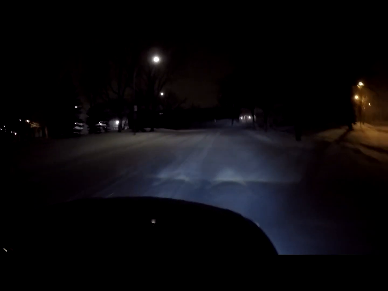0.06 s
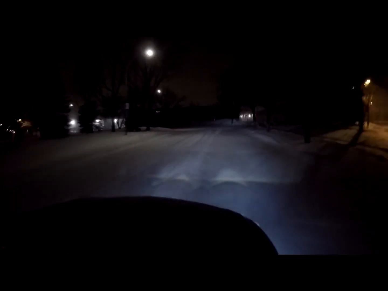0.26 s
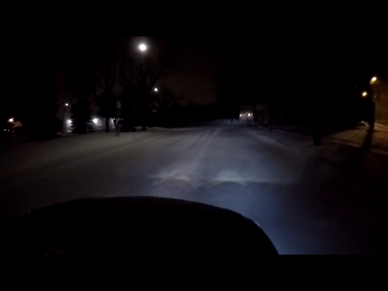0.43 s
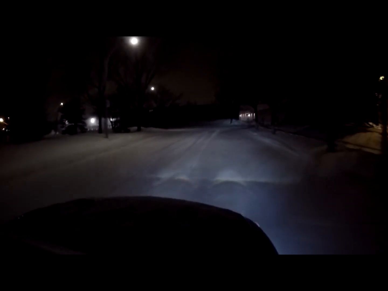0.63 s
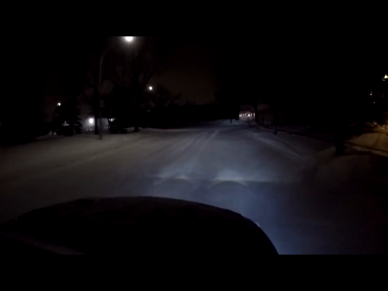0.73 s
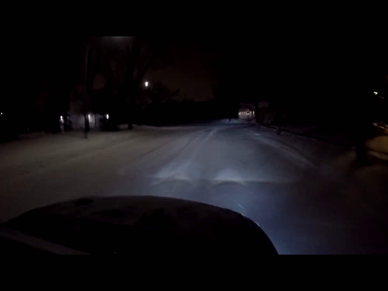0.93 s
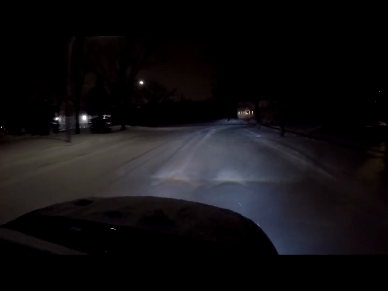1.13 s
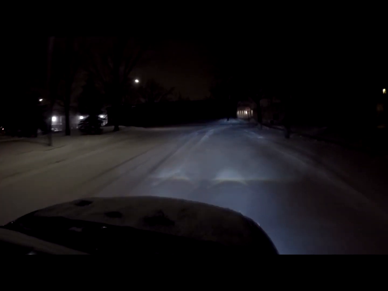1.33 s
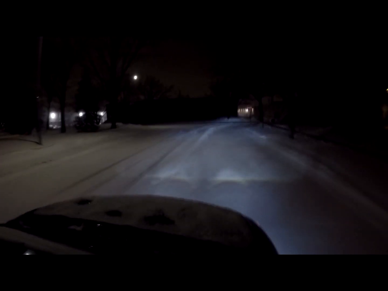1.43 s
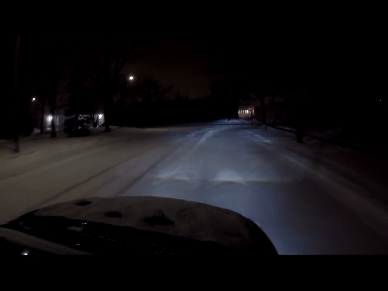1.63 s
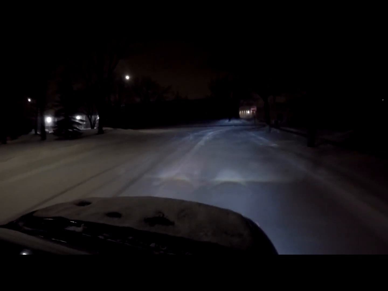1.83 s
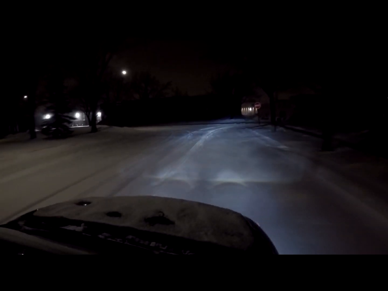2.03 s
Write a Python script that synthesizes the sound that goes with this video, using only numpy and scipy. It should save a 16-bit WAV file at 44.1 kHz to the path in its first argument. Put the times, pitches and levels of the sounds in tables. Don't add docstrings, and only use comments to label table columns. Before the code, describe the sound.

Loud wind buffets a microphone outside a moving car for about two seconds, already at full strength and never stopping. Dense bass rumble and irregular thumps, one heavy near 1.1 s, carry rough fluttering rushes. Crackling bursts crowd 0.3-0.6 s and 1.4-1.6 s, with slight lulls around 1.2 and 1.7 s. Thin snow hiss and faint ice ticks from 0.9 s lie almost buried; treble is dull, peaks squashed.

```python
import sys
import numpy as np
from scipy import signal
from scipy.fft import rfft, irfft
from scipy.io import wavfile
from scipy.ndimage import uniform_filter1d, minimum_filter1d

SR = 44100
rng = np.random.default_rng(int(sys.argv[2]) if len(sys.argv) > 2 else 0)


def to_wav(sig):
    pcm = np.clip(np.atleast_2d(sig), -1, 1) * 32767
    pcm = np.round(pcm).astype(np.int16)
    wavfile.write(sys.argv[1], SR, pcm.T)


def volts_from_db(level):
    exponent = np.asarray(level, float) / 20
    return 10 ** exponent


N = 91110


def level(x, db):
    return x * volts_from_db(db) / np.sqrt(np.mean(x ** 2))


def along(table, hz):
    table_hz, value = np.array(table).T
    return np.interp(np.log(hz), np.log(table_hz), value)


def above(corner_hz, f):
    return np.maximum(np.log2(f / corner_hz), 0)


def below(corner_hz, f):
    return np.maximum(np.log2(corner_hz / f), 0)


def smooth_twice(x, k):
    return uniform_filter1d(uniform_filter1d(x, k), k)


def walk(rate):
    k = int(SR / rate)
    held = np.repeat(rng.standard_normal(N // k + 1), k)
    w = smooth_twice(held, k)[:N]
    return (w - w.mean()) / w.std()


def flutter(rate):
    w = walk(rate)
    w = w - uniform_filter1d(w, int(0.03 * SR))
    return w / w.std()


def bumps(table, t):
    rows = np.array(table)
    bell = np.exp(-0.5 * ((t - rows[:, :1]) / rows[:, 1:2]) ** 2)
    return bell, rows[:, 2:]


def bands(x, gain_db, lo_hz, count):
    f = np.maximum(np.arange(N // 2 + 1) * SR / N, 1)
    spectrum = rfft(x) * volts_from_db(gain_db(f))
    for k in range(count):
        lowest, highest = (-1 if k else 0), (1 if k < count - 1 else 0)
        off = np.clip(2 * np.log2(f / lo_hz) - k, lowest, highest)
        yield lo_hz * 2 ** (k / 2), irfft(spectrum * np.cos(off * np.pi / 2) ** 2, N)


# start_s [s], level_db [dB]
SNOW_HISS = [
    (0, -49),
    (.26, -47),
    (.5, -48),
    (.9, -52.5),
    (1.0, -43),
    (1.27, -46),
    (1.35, -46),
    (1.7, -52.5),
    (2.07, -59),
]


def snow(t):
    highpass = signal.butter(2, 5000, "high", fs=SR, output="sos")
    hiss = signal.sosfilt(highpass, rng.standard_normal(N))
    start_s, level_db = np.array(SNOW_HISS).T
    return level(hiss, 0) * volts_from_db(np.interp(t, start_s, level_db) + 1.2 * walk(54))


# start_s [s], ring_hz [Hz], peak_db [dB]
ICE_TICKS = [
    (0.908, 5900, -25),
    (.908, 6500, -26),
    (0.908, 9000, -35),
    (1.018, 9600, -32),
    (1.018, 11300, -29),
    (1.589, 5450, -31),
    (1.757, 5260, -27),
    (1.858, 4730, -33),
    (1.955, 6040, -32),
]


def ticks(t):
    rise_s, t60_s = 0.0003, 0.007
    out = 0
    for start_s, ring_hz, peak_db in ICE_TICKS:
        age = np.maximum(t - start_s, 0)
        envelope = (1 - np.exp(-age / rise_s)) * np.exp(-np.log(1000) * age / t60_s)
        out = out + volts_from_db(peak_db) * envelope * np.sin(2 * np.pi * ring_hz * age)
    return out


# start_s [s], peak_db [dB]
SNAP_EVENTS = [(0.0498, -13), (0.283, -13), (0.3583, -19.5), (0.391, -8.5), (0.3986, -8.5), (0.4324, -26),
               (0.4693, -17), (0.4784, -19.5), (0.4824, -12.5), (0.4965, -17.5), (0.5066, -20.5),
               (0.5167, -20), (0.5246, -17), (0.5353, -11), (0.562, -14.5), (0.5674, -28), (0.5844, -12.5),
               (0.5954, -22), (0.6634, -18), (0.6799, -21.5), (0.7159, -12), (0.7234, -17), (0.7446, -15),
               (0.7855, -15), (0.8096, -15.5), (0.9016, -16), (0.974, -14), (1.0011, -20), (1.0324, -21),
               (1.0814, -15), (1.2986, -18), (1.3157, -14.5), (1.378, -17), (1.3902, -16), (1.4006, -17),
               (1.4216, -11.5), (1.4616, -21), (1.5354, -18.5), (1.555, -14), (1.5874, -25.5),
               (1.6142, -25), (1.6922, -14.5), (1.7473, -16), (1.7552, -14), (1.7684, -20), (1.7918, -25.5),
               (1.846, -22), (1.8556, -12), (1.8677, -21), (1.878, -13.5), (1.9114, -19.5), (1.9581, -22),
               (1.9795, -19), (1.9958, -17), (2.0265, -16.5)]


def snaps(t):
    rise_s, fall_s, trim_db = 0.00064, 0.0016, -6.5
    low_hz, tilt_db = 1270, 0.5
    lead = 40
    start_s, peak_db = np.array(SNAP_EVENTS).T[:, :, None]
    age = np.arange(600) / SR
    envelope = (1 - np.exp(-age / rise_s)) * np.exp(-age / fall_s)
    burst = rng.standard_normal((len(SNAP_EVENTS), len(age))) * envelope
    f = np.maximum(np.arange(len(age) // 2 + 1) / age[-1], 1)
    colour_db = along(RUSH_COLOUR, f) + tilt_db * np.log2(f / low_hz)
    colour_db = colour_db - 18 * below(low_hz, f) - 14 * above(5200, f)
    burst = irfft(rfft(np.roll(burst, lead, axis=1)) * volts_from_db(colour_db))
    strength = np.sqrt((burst ** 2).sum(1, keepdims=True) / (fall_s * SR))
    burst = burst * volts_from_db(peak_db + trim_db) / strength
    out = np.zeros(N + len(age))
    np.add.at(out, (start_s * SR).astype(int) + np.arange(len(age)) - lead, burst)
    return out[:N]


# start_s (centre) [s],
# half_length_s [s], strength_db [dB over the steady rush]
EDDY_SWEEPS = [(0.034, 0.021, 4), (0.12, 0.0089, -1), (0.204, 0.032, -2), (0.297, 0.012, 6),
               (0.398, 0.0061, 9), (0.503, 0.011, 6.5), (0.579, 0.013, 6), (0.679, 0.0089, 2.5),
               (0.732, 0.025, 2.5), (0.817, 0.0099, 6), (0.902, 0.0015, -5.5), (0.977, 0.012, 1.5),
               (1.029, 0.0033, 5.5), (1.086, 0.0062, 2), (1.138, 0.0017, 1.5), (1.201, 0.027, -5),
               (1.316, 0.011, 4), (1.394, 0.017, 6.5), (1.47, 0.0087, 9), (1.548, 0.016, 9.5),
               (1.589, 0.025, 5), (1.7, 0.0084, -5), (1.755, 0.0046, -1.5), (1.8, 0.0053, 3.5),
               (1.859, 0.0033, -1), (1.979, 0.051, -2), (2.047, 0.024, -8),
               (0.05, 0.0017, -0.5), (0.112, 0.0021, -2), (0.425, 0.0078, 6.5), (0.479, 0.0075, 11),
               (0.521, 0.0083, 9.5), (0.585, 0.0046, -13.5), (0.795, 0.0026, -2.5), (1.412, 0.004, 2),
               (1.629, 0.0041, -16), (1.873, 0.0033, 0), (1.756, 0.0058, 5.5), (1.856, 0.0035, 5),
               (0.425, 0.0024, 2), (1.592, 0.0011, 17), (0.567, .005, 4), (1.988, 0.0026, -2),
               (2.035, 0.0038, 0)]
# start_s (centre) [s], half_length_s [s], depth_db [dB]
FLOW_LULLS = [(.265, 0.023, -0.5), (.425, 0.0032, -2), (.46, .005, -1), (.545, 0.0094, 0.5),
              (.625, 0.0069, -1.5), (.875, 0.01, -1.5), (1.05, 0.015, -1.5), (1.245, 0.019, -4),
              (1.44, 0.01, -3), (1.5, 0.025, -4), (1.675, 0.0041, -3.5), (1.82, 0.0068, -6.5)]
# pitch_hz [Hz], level_db [dB per Hz]
RUSH_COLOUR = [(150, -35.5), (330, 0.5), (700, -5), (1600, -15.5), (2400, -21), (4200, -29.5),
               (7000, -38.5), (12000, -57.5)]
# pitch_hz [Hz], share [0-1]
EDDY_FOLLOW = [(300, 0.033), (700, 0.63), (1500, 0.88), (4000, 0.78), (6000, 0.36), (9000, 0.35)]


def rush(t):
    shared_db, neighbour_db, own_db = 1.02, 0.91, -0.32
    grains_per_s, grain_spread_db, grain_db = 1200, 3, -12
    crackle = 0.63
    bell, strength_db = bumps(EDDY_SWEEPS, t)
    dip, depth_db = bumps(FLOW_LULLS, t)
    eddy_db = 10 * np.log10(1 + (volts_from_db(strength_db) ** 2 * bell).sum(0))
    eddy_db = eddy_db + (depth_db * dip).sum(0) + shared_db * flutter(170)

    struck = rng.random(N) < grains_per_s / SR
    size = volts_from_db(-grain_spread_db * np.log(1 - 0.97 * rng.random(N)))
    grains = struck * size * np.sign(rng.standard_normal(N))
    source = rng.standard_normal(N) + level(grains * volts_from_db(crackle * eddy_db), grain_db)

    def colour(f):
        return along(RUSH_COLOUR, f) - 18 * below(150, f)

    out, steady, near = 0, 0, walk(33)
    for hz, band in bands(source, colour, 240.0, count=11):
        near = 0.7 * near + 0.7 * walk(70)
        swell_db = along(EDDY_FOLLOW, hz) * eddy_db
        out = out + band * volts_from_db(swell_db + neighbour_db * near + own_db * walk(80))
        steady = steady + band
    return out * volts_from_db(-22.5) / steady.std()


# start_s [s], peak_db [dB], pitch_hz [Hz]
SWIRL_EVENTS = [(0.052, -9.5, 571), (0.397, -14, 583), (0.431, -13, 476), (0.512, -7, 950),
                (0.581, -18, 579), (0.712, -13, 544), (0.739, -11, 487), (0.811, -16, 519),
                (0.947, -9, 660), (0.965, -7, 557), (1.08, -23, 480), (1.14, -14, 446), (1.157, -12, 590),
                (1.194, -17, 576), (1.215, -16, 660), (1.285, -28, 549), (1.301, -20, 463),
                (1.317, -19, 660), (1.354, -9, 590), (1.391, -15.5, 600), (1.422, -13, 447),
                (1.45, -10, 708), (1.46, -10, 610), (1.518, -10, 665), (1.534, -4, 764), (1.61, -8, 638),
                (1.747, -16, 490), (1.926, -8, 467), (1.97, -11, 565), (2.009, -19, 528)]


def swirls(t):
    half_cycles, lag_s, trim_db = 1.7, 0.002915, -5
    out = 0
    for start_s, peak_db, pitch_hz in SWIRL_EVENTS:
        turns = (t - start_s - lag_s) * pitch_hz
        swing = np.sin(2 * np.pi * (turns + rng.random()))
        out = out + volts_from_db(peak_db + trim_db) * np.exp(-0.5 * (turns / half_cycles) ** 2) * swing
    return out


# start_s (centre) [s], pitch_hz [Hz], peak_db [dB]
THUMP_EVENTS = [(0.063, 354, -7.5), (0.273, 290, -9.5), (0.331, 179.4, -6.5), (0.477, 160, -7.5),
                (0.489, 316, -5.5), (0.545, 168, -5), (0.693, 322, -9), (0.735, 218, -5), (0.778, 381, -6),
                (0.801, 387, -8), (0.82, 156, -9.5), (0.868, 274, -9.5), (0.98, 218, -30), (1.046, 386, -6),
                (1.054, 113, -10.5), (1.11, 166, -0.5), (1.214, 353, -8), (1.411, 200, -5),
                (1.466, 291, -7), (1.496, 220, -8.5), (1.604, 200, -7), (1.683, 240, -8),
                (1.721, 290, -7.5), (1.734, 138, -8.5), (1.851, 223, -7), (1.879, 202, -22),
                (1.88, 324, -9), (1.887, 100.6, -16), (1.945, 397, -10.5), (2.014, 176, -11.5),
                (0.078, 284, -9), (0.09, 200, -14), (0.79, 285, -12.5), (0.838, 275, -11), (1.93, 273, -14),
                (1.986, 265, -8.5), (0.43, 540, -16), (0.636, 215, -12), (1.209, 262, -13), (1.9, 254, -13)]


def thumps(t):
    half_cycles, sag, trim_db = 1.3, 0.013, -3
    out = 0
    for start_s, pitch_hz, peak_db in THUMP_EVENTS:
        turns = (t - start_s) * pitch_hz
        sagging = turns - sag * turns ** 2 / 2 / half_cycles
        swing = np.sin(2 * np.pi * (sagging + rng.random()))
        out = out + volts_from_db(peak_db + trim_db) * np.exp(-0.5 * (turns / half_cycles) ** 2) * swing
    return out


# start_s [s], level_db [dB], tilt_db [dB per octave toward small sizes]
BUFFET_SWELLS = [(0.0, -20.5, 10), (0.08, -10.5, -4), (0.11, -20.5, 2), (0.17, -19.5, 3.5),
                 (0.25, -13.5, 1.5), (0.3, -21.5, -4), (0.33, -13.5, -1), (1.02, -12.5, -0.5),
                 (1.11, -10, 0), (1.2, -16, -1.5), (1.48, -10.5, 1), (1.55, -16, 1.5), (1.61, -9, -3),
                 (1.64, -15, 2), (1.68, -13.5, -3.5), (1.82, -14.5, -0.5), (1.85, -10, -1),
                 (2.07, -13, 2.5)]
# pitch_hz [Hz], level_db [dB per Hz]
BUFFET_COLOUR = [(20, -9), (50, -8), (110, -1.5), (160, -1.5), (220, -2.5), (330, -9), (500, -15),
                 (900, -49.5)]


def buffet(t):
    even_cycles, even_share = 5, 0.6
    start_s, level_db, tilt_db = np.array(BUFFET_SWELLS).T

    def colour(f):
        return along(BUFFET_COLOUR, f) - 12 * below(20, f) - 30 * above(900, f)

    out, steady = 0, 0
    for hz, band in bands(rng.standard_normal(N), colour, 31.5, count=9):
        power = smooth_twice(band ** 2, int(even_cycles * SR / hz)) / np.mean(band ** 2)
        band = band / power ** (even_share / 2)
        swell_db = np.interp(t, start_s, level_db + tilt_db * np.log2(hz / 150))
        wander_db = 1.04 * min(hz / 100, 1) * walk(24)
        out = out + band * volts_from_db(wander_db + swell_db)
        steady = steady + band
    return out * volts_from_db(-2.5) / steady.std()


# pitch_hz [Hz], level_db [dB]
HOUSING_RESPONSE = [(2500, 1), (3150, -3), (4200, 3), (5500, -0.5), (7400, -4.5), (8600, -7.5),
                    (9800, -15.5), (11300, -22.5), (12500, -32)]


def scene():
    t = np.arange(N) / SR
    air = snow(t) + ticks(t) + snaps(t) + rush(t) + swirls(t) + thumps(t) + buffet(t)
    air = np.concatenate([air, air[::-1]])
    f = np.maximum(np.arange(N + 1) * SR / 2 / N, 1)
    heard = irfft(rfft(air) * volts_from_db(along(HOUSING_RESPONSE, f)))
    return heard[None, :N]


def top_cut(x):
    return signal.sosfilt(signal.butter(12, 12830, fs=SR, output="sos"), x)


def record(dry):
    ceiling, limit_s = 0.89, 0.006
    k = int(limit_s * SR)
    need = minimum_filter1d(np.minimum(1, ceiling / (np.abs(dry) + 1e-9)), k)
    gain = smooth_twice(need, k // 2)
    return top_cut(dry * gain)


dry = scene()
out = record(dry)
to_wav(out)
```